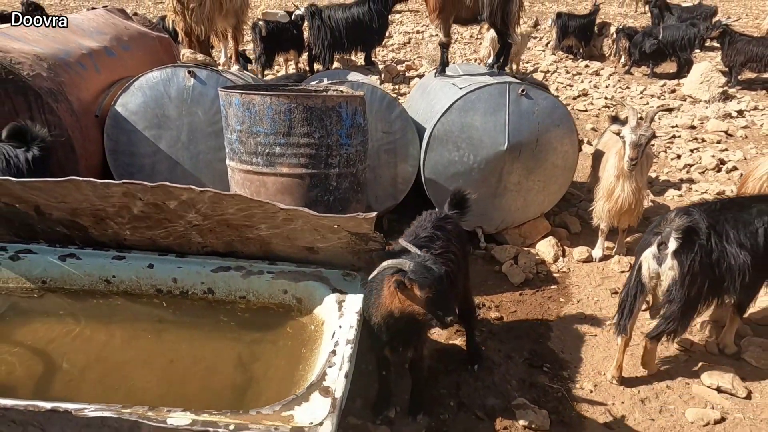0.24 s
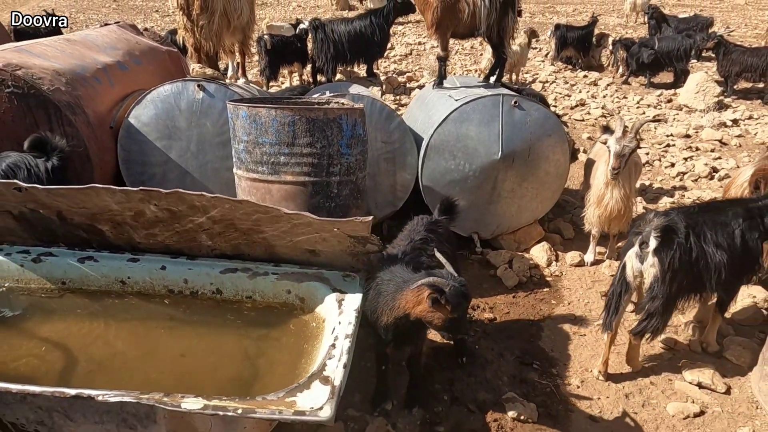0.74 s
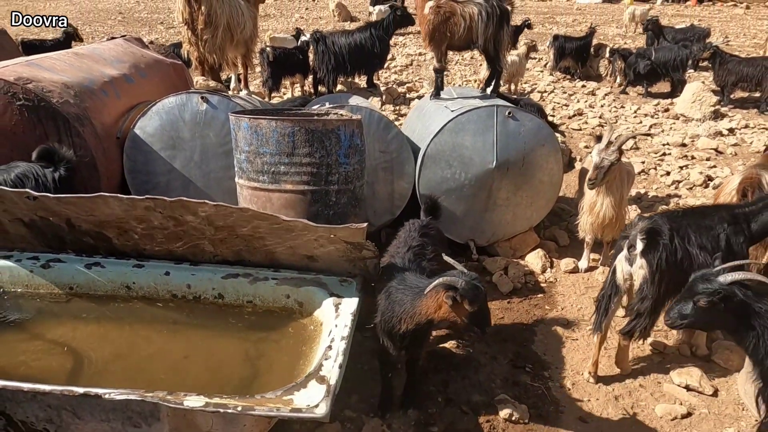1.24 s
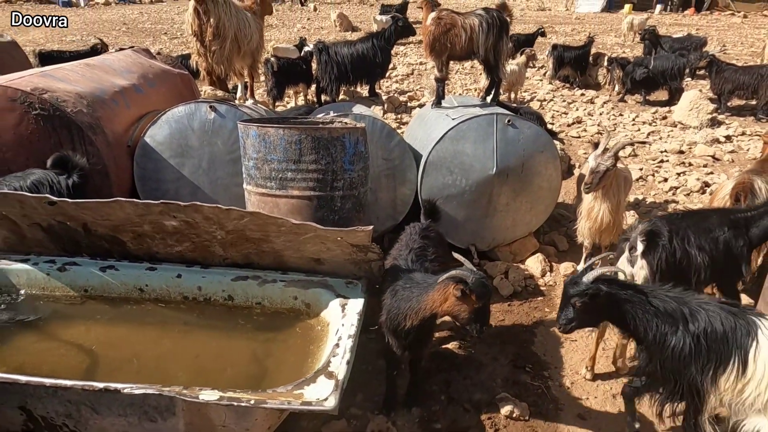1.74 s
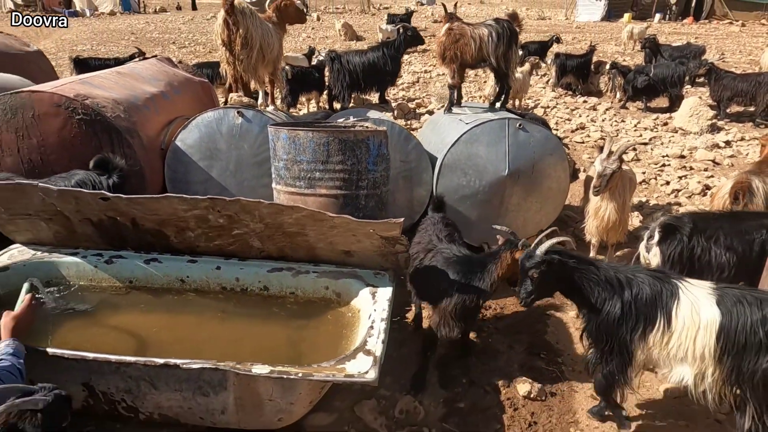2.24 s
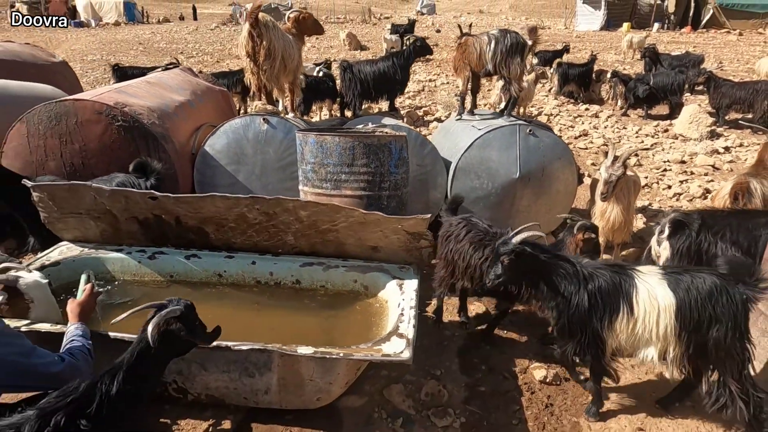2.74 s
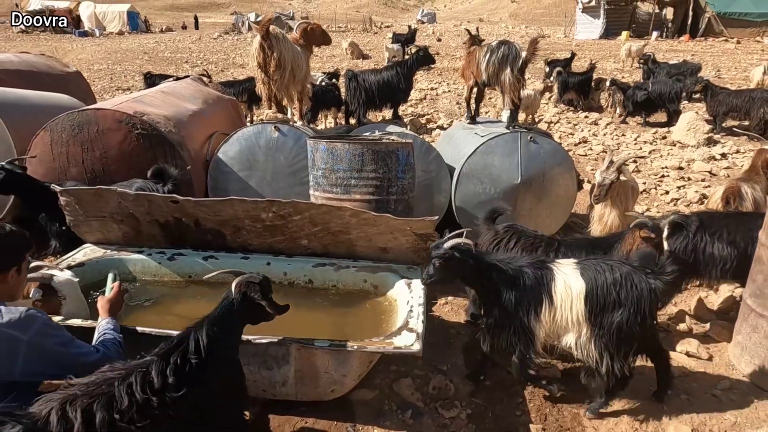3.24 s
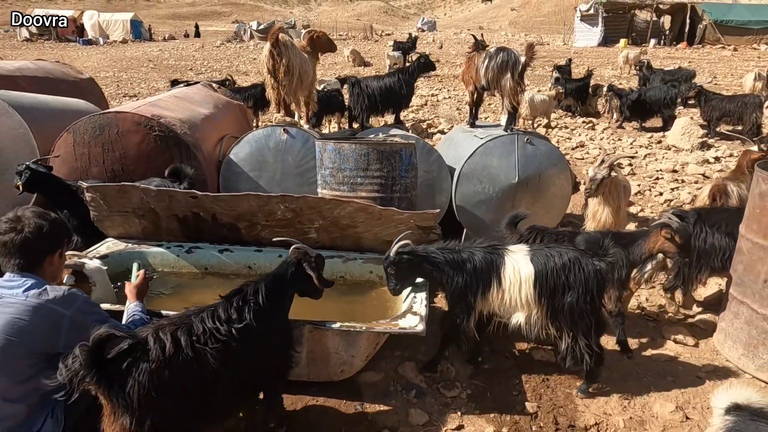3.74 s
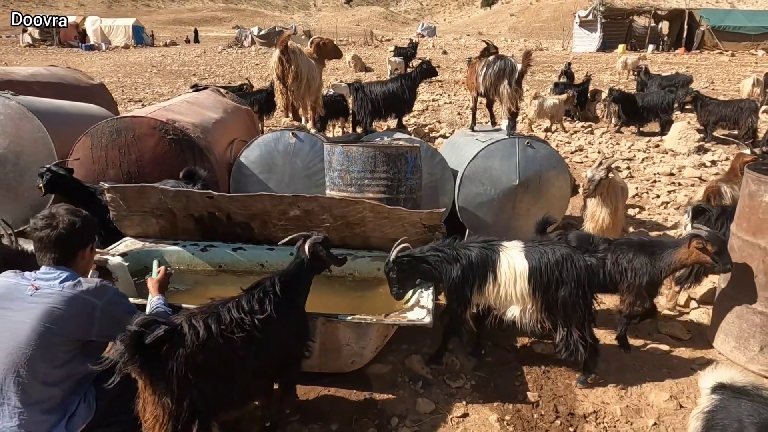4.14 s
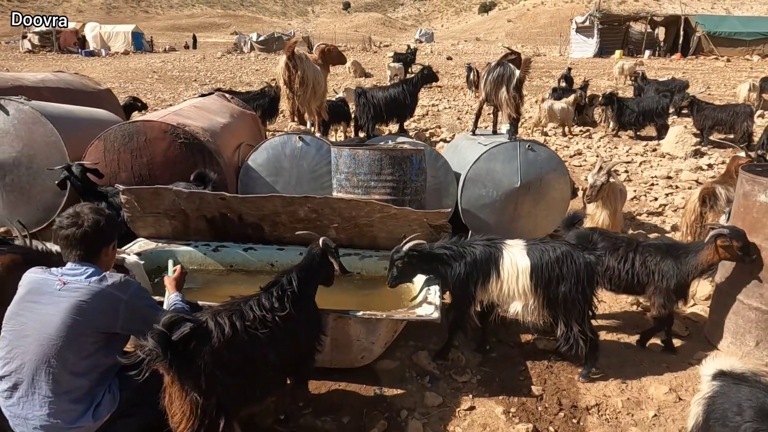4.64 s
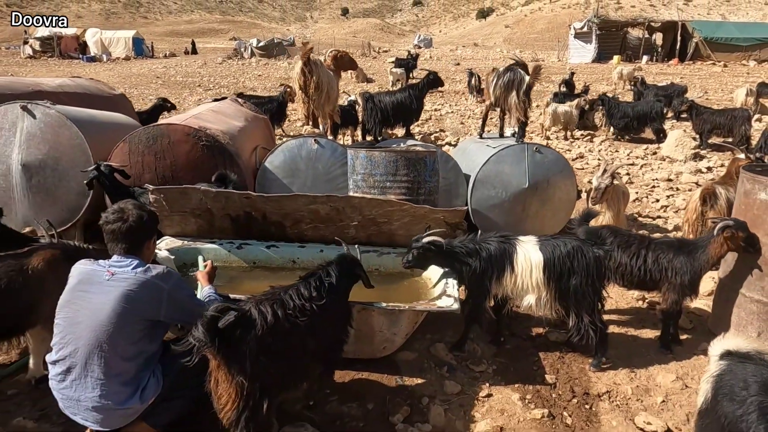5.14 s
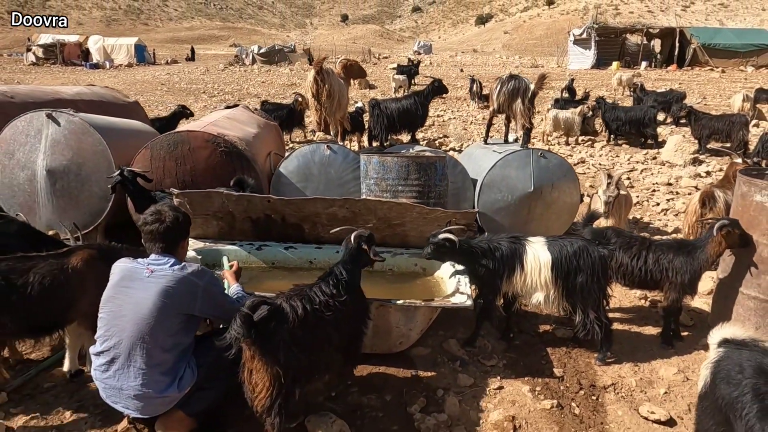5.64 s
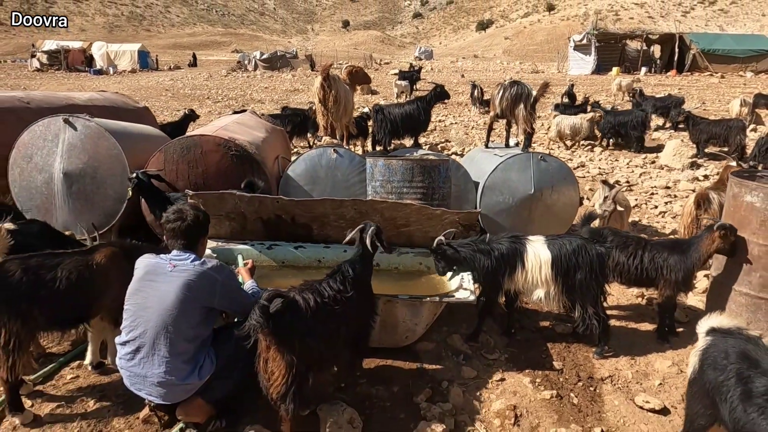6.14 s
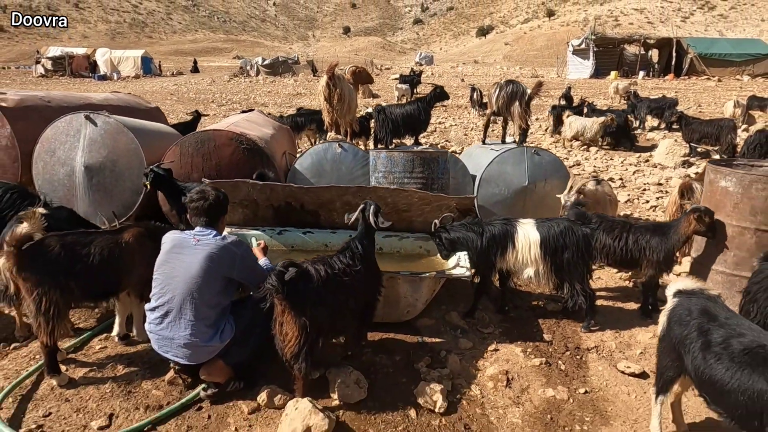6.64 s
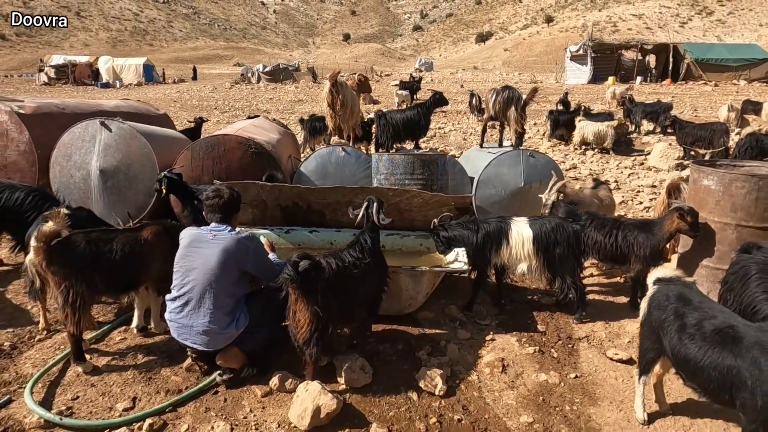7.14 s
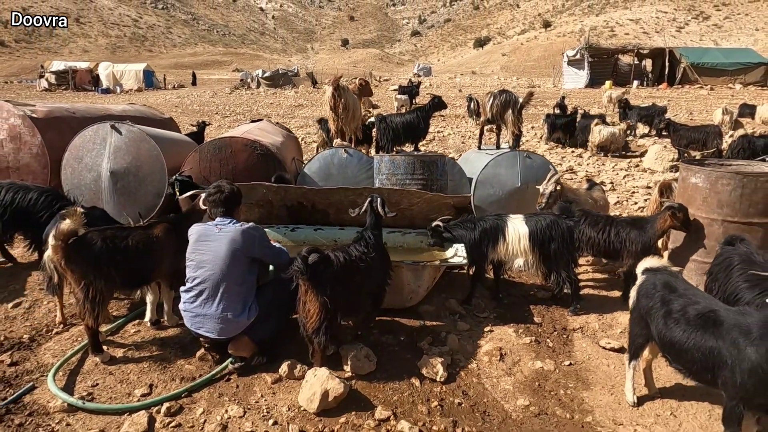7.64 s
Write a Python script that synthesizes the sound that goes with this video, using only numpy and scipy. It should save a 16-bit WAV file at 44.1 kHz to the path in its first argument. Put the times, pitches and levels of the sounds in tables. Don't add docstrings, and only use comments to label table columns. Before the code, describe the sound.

A near goat gives several trembling bleats, answered by shorter calls, over low wind rumble, hoof knocks and gravel scuffs outdoors.

```python
import sys
import numpy as np
from scipy import signal
from scipy.fft import rfft, irfft
from scipy.io import wavfile
from scipy.ndimage import uniform_filter1d

SR = 44100
rng = np.random.default_rng(int(sys.argv[2]) if len(sys.argv) > 2 else 0)


def boost_factor(decibels):
    exponent = np.asarray(decibels, float) / 20
    return 10 ** exponent


def dump(signal):
    limited = np.clip(np.atleast_2d(signal).T, -1, 1)
    pcm = np.round(limited * 32767).astype(np.int16)
    wavfile.write(sys.argv[1], SR, pcm)


N = 347980
TIME = np.arange(N) / SR


def at_hz(points, hz):
    point_hz, point_db = np.transpose(points)
    return np.interp(np.log(hz), np.log(point_hz), point_db)


def rms_one(x):
    return x / np.sqrt(np.mean(x ** 2) + 1e-20)


def drift(rate, size=N):
    r = np.exp(-80 * np.pi * rate / SR)
    slow = signal.lfilter([1], [1, -2 * r, r * r], rng.standard_normal(size // 40 + 2002))[2000:]
    return np.interp(np.arange(size) / 40, np.arange(len(slow)), rms_one(slow))


def band(x, low_hz, high_hz):
    edges_hz = [low_hz, min(high_hz, .45 * SR)]
    return signal.sosfilt(signal.butter(2, edges_hz, "band", fs=SR, output="sos"), x)


def ring(clicks, hz, t60):
    r, w = boost_factor(-60 / (t60 * SR)), 2 * np.pi * hz / SR
    return signal.lfilter([0, np.sin(w)], [1, -2 * r * np.cos(w), r * r], clicks + 1e-18)


def grit(shape, density, spread_db):
    sizes = boost_factor(spread_db * np.minimum(rng.exponential(1, shape), 4)) * rng.choice([-1, 1], shape)
    return sizes * (rng.random(shape) < density)


# [t/s, rumble level/dB]
GUSTS = [(0, -26), (.17, -37.5), (.9, -36.5), (1.05, -33.5), (1.25, -38), (1.4, -26.5), (1.75, -23),
         (2.0, -32), (2.3, -21), (2.5, -30.5), (3.15, -32.5), (3.4, -24), (3.93, -21), (4.2, -32),
         (4.4, -24), (4.92, -22), (5.04, -28.5), (5.2, -23.5), (6.4, -24.5), (7.54, -29.5), (7.89, -26)]
# [t/s, peak level/dB]
SLAPS = [(.047, -30), (.07, -31), (0.306, -32.5), (1.487, -31), (1.52, -33.5), (4.262, -28.5), (4.345, -27),
         (4.893, -23), (1.065, -24.5), (1.383, -18.5), (1.398, -26), (1.416, -23), (1.622, -28.5),
         (1.676, -22.5), (1.724, -12.5), (1.788, -26), (2.266, -26), (2.303, -15), (2.318, -13.5),
         (2.335, -22.5), (2.512, -26), (3.296, -23.5), (4.332, -22.5), (4.515, -22), (4.651, -16.5),
         (4.927, -25), (7.818, -24.5), (7.847, -18.5)]
# offset (dB), share of the gust's swing, share of an eddy's swell
BUFFET, FLUTTER = (-38.5, 0.84, 0.39), (-49, 0.5, 0.4)
EDDY_S, EDDY_FROM_DB = 0.028, -34


def gusts():
    coarse = TIME[::40]
    gust_db = np.interp(TIME, *np.transpose(GUSTS))
    swells = [max(db - EDDY_FROM_DB, 0) * np.exp(-((coarse - at) / EDDY_S) ** 2) for at, db in SLAPS]
    swell_db = np.interp(TIME, coarse, np.max(swells, axis=0))
    swing_db = gust_db - gust_db.mean()
    upper = [db + follows * swing_db + stirs * swell_db for db, follows, stirs in (BUFFET, FLUTTER)]
    return [gust_db] + upper


# [f/Hz, level/dB per Hz]
WIND_COLOUR = [(12, -38), (20, 2.5), (65, -2), (189, -11.5), (310, -26), (348, -25.5), (472, -36.5),
               (640, -41.5), (830, -65), (1410, -120)]


def wind():
    hz = np.arange(1, N // 2 + 2) * SR / N
    turbulence = rfft(rng.standard_normal(N)) * boost_factor(at_hz(WIND_COLOUR, hz))
    below_80, below_200 = [1 / (1 + (hz / edge) ** 7) for edge in (80, 200)]
    ranges = [below_80, below_200 - below_80, 1 - below_200]
    lumps, out = drift(25.8), np.zeros(N)
    for share, level_db, shared_db, own_db in zip(ranges, gusts(), (1.2, 2.5, 3.8), (1.2, 1.8, 2.8)):
        gain = boost_factor(level_db + shared_db * lumps + own_db * drift(17.7) - 1.5)
        out += gain * rms_one(irfft(turbulence * share, N))
    lean_s = 0.00372
    t = np.arange(-400, 1400) / SR
    push = np.exp(-np.abs(t - lean_s) / (0.47 * lean_s))
    push -= 0.3 * np.exp(-((t - 3 * lean_s) / (2.0 * lean_s)) ** 2)
    push = np.convolve(push, np.hanning(25) / 12, "same")
    for at, db in SLAPS:
        i = round(at * SR) - 400
        out[i:i + len(t)] -= boost_factor(db + 7.5) * push[:N - i]
    return out


def patchy(white, spectrum, low_hz, high_hz, shared_db, own_db, rate):
    out, together = 0, drift(rate)
    edges = low_hz * 2 ** np.arange(0, np.log2(high_hz / low_hz) + .25, .5)
    for k, (low, high) in enumerate(zip(edges, edges[1:])):
        level_db = at_hz(spectrum, np.sqrt(low * high)) + shared_db * together + own_db * drift(rate)
        out = out + boost_factor(level_db) * band(white[k % 2], low, high)
    return rms_one(out)


# [t/s, level/dB]
SHUFFLE = [(0.0, -59), (1.34, -51.5), (1.95, -57.5), (2.52, -50), (5.49, -55), (5.82, -53.5), (6.31, -58),
           (7.58, -58), (7.89, -52)]
# [f/Hz, level/dB per Hz]
SHUFFLE_COLOUR = [(210, -31), (350, 2.5), (758, -12), (827, -20), (1380, -7), (1500, -19), (2030, -7.5),
                  (2380, -13), (4670, -16.5), (6870, -29), (8930, -67.5), (15100, -120)]
# [f/Hz, width/Hz, level/dB]
FLOCK = [(948, 277, -1.5), (2123, 290, -5), (2900, 500, -8.5)]


def shuffle():
    s, level_db = np.transpose(SHUFFLE)
    bed = patchy(rng.standard_normal((2, N)), SHUFFLE_COLOUR, 385.6, 8000, 3.0, 4.24, rate=25.7)
    clicks = grit(N, 150 / SR * boost_factor(5 * drift(5.5)), spread_db=2.5)
    dealt = rng.integers(0, 16, N)
    crunch, air = 0, rng.standard_normal(N)
    for k, hz in enumerate(np.geomspace(800, 6500, 16)):
        puffs = signal.fftconvolve(np.abs(clicks) * (dealt == k), np.hanning(500), "same") * air
        stones = ring(puffs, hz, 22 / hz) * np.sqrt(hz / SR)
        crunch = crunch + boost_factor(at_hz(SHUFFLE_COLOUR, hz)) * stones
    chorus = 0
    for hz, width, db in FLOCK:
        gain = boost_factor(db + 4.7 * drift(17.5) + 0.5)
        chorus = chorus + gain * rms_one(band(rng.standard_normal(N), hz - width / 2, hz + width / 2))
    flock = bed + boost_factor(-2.5) * rms_one(crunch) + boost_factor(-9.5) * chorus
    return boost_factor(np.interp(TIME, s, level_db)) * flock


# [t/s, bright level/dB, brightest level/dB]
RUSTLE = [(0, -91, -94), (.6, -88, -88), (1.4, -87.5, -90), (1.52, -88.5, -112), (4.3, -88.5, -112),
          (5.0, -89.5, -112), (7.3, -96, -112), (7.89, -90, -105)]


def rustle():
    s, bright_db, brightest_db = np.transpose(RUSTLE)
    white, patches = rng.standard_normal((2, N)), drift(35)

    def steep(x, low_hz, high_hz):
        return rms_one(band(band(x, low_hz, high_hz), low_hz, high_hz))

    bright_gain = boost_factor(np.interp(TIME, s, bright_db) + 6.5 * patches)
    brightest_gain = boost_factor(np.interp(TIME, s, brightest_db) + 3.1 * patches + 3.0 * drift(30))
    return bright_gain * steep(white[0], 7000, 11200) + brightest_gain * steep(white[1], 11700, 14000)


# [t/s, length/s, level/dB, centre f/Hz]
SCUFFS = [(1.225, 0.02, -49, 3500), (2.952, 0.051, -38.5, 700), (3.003, 0.38, -51, 500),
          (5.6, 0.016, -58, 4350), (5.124, 0.048, -38.5, 1470), (5.138, 0.01, -39, 2500),
          (5.05, 0.017, -50, 2500), (4.7, 0.029, -50, 2500), (5.262, 0.074, -45, 1140),
          (5.335, 0.023, -54, 5400), (1.5, 0.036, -49, 1300), (5.249, 0.019, -32.5, 2250),
          (5.22, 0.066, -38.5, 1460), (7.671, 0.022, -43, 3800), (7.7, 0.089, -41.5, 900),
          (7.695, 0.063, -49, 2640), (2.953, 0.045, -46.5, 2400), (1.99, 0.065, -52.5, 2200),
          (7.832, 0.029, -56, 3600), (7.55, 0.12, -57, 1400), (.08, 0.028, -55.5, 2600),
          (5.6, 0.013, -52, 3000), (1.745, 0.016, -50, 2300)]


def scuffs():
    out = np.zeros(N)
    for at, length, db, hz in SCUFFS:
        u = np.arange(SR // 4) / SR / length
        gravel = grit(len(u), .08, spread_db=3.5)
        crunch = rms_one(band(band(gravel, hz / 1.8, hz * 1.7), hz / 2.4, hz * 1.9))
        swell = np.minimum(u * length / 0.0046, 1) * np.exp(-u ** 3)
        i = round(at * SR)
        out[i:i + len(u)] += (boost_factor(db) * crunch * swell)[:N - i]
    return out


def steps(events, broad_db, gain_db, ring_s, low_hz, high_hz, contact, reach):
    out, t = np.zeros(N), np.arange(SR // 6) / SR
    crunch = grit((len(events), len(t)), .13, spread_db=6.5)
    crunch[:, 20:28] += contact * np.hanning(8)
    for (at, db, hz, t60), grains in zip(events, crunch):
        burst = grains * boost_factor(-60 * t / max(t60, .005))
        stone = rms_one(ring(burst, hz, ring_s) - 0.73 * ring(burst, hz * 1.155, ring_s))
        sound = stone + boost_factor(broad_db) * rms_one(band(burst, low_hz, high_hz))
        sound = signal.sosfilt(signal.butter(3, min(reach * hz, 9000), fs=SR, output="sos"), sound)
        i = round(at * SR)
        out[i:i + len(t)] += (boost_factor(db + gain_db) * sound / np.abs(sound).max())[:N - i]
    return out


# [t/s, peak level/dB, f/Hz, t60/s]
KNOCKS = [(1.936, -33, 1480, 0.038), (2.109, -36, 1520, 0.04), (3.079, -36, 1110, 0.048),
          (3.13, -30, 1150, 0.039), (4.601, -31.5, 1280, 0.04), (4.844, -36.5, 2030, 0.023),
          (5.019, -42, 1060, 0.068), (5.1245, -14.5, 1150, 0.028), (5.14, -26, 1250, 0.04),
          (5.162, -31, 1160, 0.086), (5.186, -25.5, 1160, 0.025), (5.188, -33, 2590, 0.02),
          (5.111, -32, 2290, 0.065), (5.268, -21, 1500, 0.04), (5.288, -27, 1240, 0.04),
          (5.32, -32, 1200, 0.04), (5.454, -36, 1010, 0.05), (6.481, -39.5, 2100, .079),
          (6.672, -45, 840, 0.092), (6.869, -37.5, 1150, 0.022), (7.751, -39, 860, 0.061),
          (5.2515, -22, 1140, .03), (7.604, -39, 696, .02), (7.755, -38, 1700, .03),
          (2.233, -43, 1000, .03), (.195, -43, 2300, .03), (.21, -42, 2200, 0.044), (.418, -43, 1600, .04),
          (4.986, -42, 2000, .03)]
# [t/s, peak level/dB, f/Hz, t60/s]
STAMPS = [(.125, -31, 1290, 0.032), (.4365, -33, 1500, 0.018), (1.707, -38, 1200, 0.03),
          (1.717, -31, 2200, 0.03), (2.302, -29, 535, 0.096), (.2555, -48, 2500, 0.02),
          (1.975, -31, 1390, 0.051), (2.957, -24, 1500, 0.03), (3.285, -29, 640, .04),
          (5.064, -21.5, 780, 0.024), (5.249, -13.5, 3130, 0.018), (5.3, -15, 700, 0.04),
          (5.261, -14, 1500, 0.085), (5.34, -27.5, 647, 0.037), (6.235, -29, 1500, 0.07),
          (6.28, -33.5, 1200, 0.079), (6.739, -39, 2030, 0.36), (7.674, -26.5, 905, 0.18),
          (7.704, -28, 750, 0.18)]


def knocks():
    heavy = dict(gain_db=-2.5, ring_s=0.011, reach=3.4, low_hz=295, high_hz=2030)
    return steps(KNOCKS, -12.0, contact=4.0, **heavy) + steps(STAMPS, 2.5, contact=9.0, **heavy)


# [t/s, peak level/dB]
TICKS = [(0.1585, -68), (.177, -64), (.285, -67), (0.3426, -57.5), (.35, -63.5), (.408, -66.5), (.437, -66),
         (0.7562, -63), (0.996, -64), (1.1934, -64), (1.248, -57.5), (2.3126, -54.5), (7.6735, -62.5),
         (7.861, -75)]


def ticks():
    out = np.zeros(N)
    fade = np.exp(-np.arange(220) / 50)
    for (at, db), puff in zip(TICKS, rng.standard_normal((len(TICKS), 220))):
        out[round(at * SR):][:220] += boost_factor(db + 36) * puff * fade
    return band(band(out, 10500, 16500), 11000, 17000)


# [t/s, peak level/dB, f/Hz, t60/s]
CLICKS = [(.256, -48, 5650, 0.02), (2.2172, -42, 3200, 0.0068), (2.2762, -53, 3200, .069),
          (2.83, -42, 3010, 0.086), (3.0046, -43, 3290, 0.043), (3.8932, -41, 2790, 0.12),
          (4.8726, -39.5, 4830, 0.022), (5.4987, -42, 2810, 0.043), (5.5363, -37, 2800, 0.041),
          (5.8752, -44, 3000, 0.024), (6.3604, -50, 5870, 0.035), (6.9182, -41, 2940, 0.076),
          (5.226, -42, 3700, .15), (7.616, -49, 5170, .03), (7.678, -42, 4530, .06),
          (7.738, -54, 5000, .02), (7.773, -50, 3500, .04), (6.995, -48, 3120, .04), (7.38, -49, 3800, .04)]
# [t/s, peak level/dB, f/Hz, t60/s]
CRUNCHES = [(.3511, -41.5, 3020, 0.056), (2.3555, -38, 2530, .03), (3.0778, -41, 4440, 0.043),
            (3.4292, -39.5, 2980, 0.051), (5.2615, -25, 3300, 0.0073), (5.3293, -38, 2900, .03),
            (5.339, -40, 5070, 0.03), (5.4374, -44, 3210, 0.061), (6.5637, -44.5, 3130, 0.017),
            (6.8124, -48, 4420, .04), (7.3828, -41.5, 2330, 0.031)]
# [t/s, peak level/dB, f/Hz]
PEBBLES = [(0.2553, -49, 5670), (0.3496, -42, 3480), (0.4978, -35, 3830), (0.6479, -41, 3800),
           (1.1184, -51, 3866), (1.2316, -37, 3520), (1.4107, -46, 3790), (1.9624, -47, 4490),
           (1.9929, -43, 4550), (2.2877, -43.5, 4340), (2.3565, -40, 4230), (2.5017, -45, 3730),
           (2.9522, -37, 4780), (3.0829, -39, 4540), (3.2121, -44, 5200), (3.2705, -40, 4900),
           (3.3877, -40, 3800), (3.4535, -41, 5020), (4.3949, -48, 4940), (4.4308, -48, 3590),
           (4.4937, -44, 5430), (4.5446, -51, 4930), (4.7022, -48, 3950), (4.8723, -37, 4760),
           (5.0205, -50, 3600), (5.0569, -46, 3830), (5.1402, -38, 3700), (5.2485, -26, 3650),
           (5.3398, -41, 4820), (5.4365, -47, 3570), (5.5373, -44, 3770), (5.874, -44, 3900),
           (6.2357, -37, 4220), (6.327, -48, 3950), (6.3609, -44, 6060), (6.5141, -51, 4770),
           (6.5655, -48, 5100), (6.775, -46, 5990), (6.8129, -44, 4400), (6.8733, -48, 3780),
           (7.3816, -48, 3870), (7.6161, -46, 5240), (7.6779, -38, 4400), (7.8366, -49, 3660)]


def hooves():
    light = dict(gain_db=3.5, ring_s=0.021, reach=2.8, low_hz=1500, high_hz=6140, contact=4.9)
    pebbles = [(s, db - 2.5, hz, .03) for s, db, hz in PEBBLES]
    return steps(CLICKS, -11.5, **light) + steps(CRUNCHES, -0.98, **light) + steps(pebbles, -4.0, **light)


# [f/Hz, share]
MOUTH_CLOSING = [(300, 0.51), (600, 0.31), (900, 2.2), (1150, 0.15), (1800, 1.44), (2150, 0.043),
                 (3000, 0.9), (7000, 0.34)]
DULLING_DB_PER_S = -100
HOARSE_TONE_DB, HOARSE_AIR_DB = -7, 16


def voice(s, pitch_hz, level_s, level_db, closing_db, throat, jitter, breath_db, tiring_db,
          breaks_s=9, dulls_s=9):
    span = slice(round(s[0] * SR), round(s[-1] * SR))
    t = TIME[span]

    def smooth(at, values, size=441):
        return uniform_filter1d(np.interp(t, at, values), size=size, mode="nearest")

    f0 = smooth(s, pitch_hz) * (1 + jitter * drift(60, size=len(t)))
    phase = 2 * np.pi * np.cumsum(f0) / SR
    order = np.arange(1, 19)[:, None]
    waver_db = 2.2 * np.array([drift(25, size=len(t)) for k in order])
    weights = boost_factor(at_hz(throat, order * f0) + waver_db)
    weights /= np.sqrt(np.sum(weights ** 2, axis=0) / 2)
    octaves_up = np.maximum(np.log2(order * f0 / 1000), 0)
    dull_db = DULLING_DB_PER_S * np.maximum(t - dulls_s, 0) * octaves_up
    weights *= boost_factor(at_hz(MOUTH_CLOSING, order * f0) * smooth(level_s, closing_db) + dull_db)
    tone = np.sum(weights * np.sin(order * phase + rng.uniform(0, 1.0, order.shape)), axis=0)

    noise = rng.standard_normal(len(t)) * (1 + np.cos(phase))
    hz = np.arange(1, len(t) // 2 + 2) * SR / len(t)
    breath = rms_one(irfft(rfft(noise) * boost_factor(at_hz(throat, hz)), len(t)))
    fade = np.clip(np.minimum(t - s[0], s[-1] - t) / 0.033, 0, 1)
    progress = (t - s[0]) / (s[-1] - s[0])
    hoarse = np.clip((t - breaks_s) / 0.015, 0, 1)
    tone_db = smooth(level_s, level_db)
    air_db = tone_db + hoarse * (smooth(level_s, level_db, size=3500) - tone_db + HOARSE_AIR_DB)
    air_db = air_db + breath_db + tiring_db * progress ** 2
    out = np.zeros(N)
    out[span] = fade * (boost_factor(tone_db + hoarse * HOARSE_TONE_DB) * tone + boost_factor(air_db) * breath)
    return out


CREST_HOLD_S, OPENING_S = .004, 0.033
SURGE_S, FIRST_RISE = .028, .88


def quaver(bleat, throbs, throat, breaks_s=9):
    count, early, fall_s, jitter, breath_db = bleat
    crest, high_hz, low_hz, loud_db, dip_db = np.transpose(throbs)
    from_hz = np.r_[FIRST_RISE * high_hz[0], low_hz[:-1]]
    soft_db = loud_db - dip_db
    before_db = np.r_[soft_db[0], soft_db[:-1]]

    surge_s, fallen_s = crest - SURGE_S, crest + fall_s + CREST_HOLD_S
    throb_s = np.c_[surge_s, crest - CREST_HOLD_S, crest + CREST_HOLD_S, fallen_s]
    s = np.r_[crest[0] - .045, throb_s.ravel(), crest[-1] + .045]
    throb_hz = np.c_[from_hz + early * (high_hz - from_hz), high_hz, high_hz, low_hz]
    pitch_hz = np.r_[from_hz[0], throb_hz.ravel(), low_hz[-1] * .95]

    mouth_s = np.c_[crest - OPENING_S, crest - .015, crest + .008, crest + .03]
    level_s = np.r_[s[0], mouth_s.ravel()]
    opening_db = 0.6 * before_db + 0.4 * loud_db + 3
    mouth_db = np.c_[opening_db, loud_db - 1.0, loud_db + 0.7, soft_db + 3]
    level_db = np.r_[loud_db[0] - 9, mouth_db.ravel()]
    closing_db = np.r_[0, np.tile([-7.5, 0, 0, -11.], count)]
    return voice(s, pitch_hz, level_s, level_db, closing_db, throat, jitter=jitter, breath_db=breath_db,
                 tiring_db=-1.5, breaks_s=breaks_s)


# [t/s, f/Hz, level/dB]
LONG_CALL = [(.92, 336.4, -53), (1.19, 345, -62), (1.25, 350, -43), (1.42, 349, -42.5), (1.55, 345, -43.5),
             (1.62, 331.6, -43), (1.662, 302.6, -38.5), (1.682, 268, -43), (1.705, 240, -63)]
WOBBLE_HZ, WOBBLE_SHARE, WOBBLE_TOP_S, WOBBLE_ENDS_S, WOBBLE_DB = 11.2, 0.022, 1.277, 1.52, 1.5


def long_call():
    at, pitch_hz, level_db = np.transpose(LONG_CALL)
    s = np.linspace(at[0], at[-1], 80)
    tremble = np.cos(2 * np.pi * WOBBLE_HZ * (s - WOBBLE_TOP_S))
    tremble = tremble * np.clip((WOBBLE_ENDS_S - s) / 0.08, .15, 1)
    trembling_hz = np.interp(s, at, pitch_hz) * (1 + WOBBLE_SHARE * tremble)
    return np.c_[s, trembling_hz, np.interp(s, at, level_db) + WOBBLE_DB * tremble]


def short_call(start, length, first_hz, last_hz, db):
    share = np.array([0, .4, .4 + .35, 1])
    pitch_hz = first_hz + (last_hz - first_hz) * np.sin(share * 1.65) / np.sin(1.65)
    return np.c_[start + length * share, pitch_hz, db - np.array([10, 0, 0, 10])]


# [throbs, early share of the climb, crest to trough/s, pitch jitter share, breath level/dB]
BLEATS = [
    (9, .55, .018, .009, -11),
    (6, .25, .026, .009, -13),
    (8, .15, .026, .006, -16),
    (7, .3, .024, .011, -12),
    (5, .5, .03, .006, -18),
]
# [crest t/s, crest f/Hz, trough f/Hz after it, level/dB, dip after it/dB]
THROBS = [(.495, 502, 420, -42.5, 2), (.588, 444.4, 378.3, -40.5, 5.5), (.68, 441.4, 374.7, -41.5, 8),
          (.772, 466, 389.6, -39, 10), (.858, 475, 416, -40.5, 5), (.95, 480.5, 414.6, -39.5, 7.5),
          (1.04, 485, 433.7, -39, 13), (1.13, 477.7, 445, -39, 10), (1.221, 467.4, 380, -39, 14),
          (2.45, 420, 399.2, -35.5, 9.5), (2.54, 445.3, 382.8, -35.5, 14), (2.625, 464.3, 355.6, -34.5, 16),
          (2.712, 442, 353.3, -39, 19), (2.803, 445.7, 349, -38.5, 18), (2.89, 425, 348.5, -43.5, 20),
          (3.655, 421, 347.5, -43, 13), (3.74, 450, 388.5, -35, 13), (3.83, 482.6, 413, -35, 12),
          (3.918, 473, 411, -35, 14), (4.008, 470, 368, -36.5, 17), (4.098, 441.6, 344.2, -40, 15),
          (4.185, 406, 343.7, -42.5, 18), (4.27, 372, 330, -44, 20), (5.582, 474.7, 374, -42.5, 7),
          (5.67, 484.3, 392.2, -34.5, 8), (5.76, 490, 404.3, -34.5, 7.5), (5.848, 496, 402.5, -35, 10.5),
          (5.935, 469, 388, -35, 17.5), (6.025, 462, 369, -37.5, 18), (6.117, 436, 369, -43, 18),
          (6.95, 384, 340, -52, 10), (7.05, 370, 325.4, -51.5, 14), (7.14, 384.3, 328, -50, 17),
          (7.23, 384, 316, -46.5, 21), (7.315, 360, 331, -47.5, 23)]
BRIGHTNESS = [.5, -4, -2, -3]
CHEST = [8.1, 1.2, 3.5, 1.5]
BREAKS_S = [9, 9, 4.105, 9]
# [f/Hz, level/dB]
NEAR_THROAT = [(200, -18.5), (450, -8), (640, -13), (830, 2.5), (950, 4.5), (1300, -7.5), (1500, -11.5),
               (1900, -3.5), (2130, 3.5), (2400, -3), (2700, -11), (3400, -4), (3900, -10), (4500, -29),
               (7000, -45)]
# [f/Hz, level/dB]
FAR_THROAT = [(200, -39), (400, -21), (750, -1), (1150, -1.5), (1500, -11), (2150, 1.5), (2450, -7),
              (2900, -1), (3400, -16.5), (4200, -14), (5000, -28), (7000, -40)]
# [f/Hz, level/dB]
HELD_THROAT = [(200, -18), (350, 2), (520, -15), (700, 0.5), (1000, 4.5), (1400, -5.5), (1700, -9),
               (2150, 2.5), (2600, -6), (3650, 1), (4300, -8), (5500, -15), (7000, -32)]
# [t/s, f/Hz, level/dB]
BARK = [(.5, 323.4, -56), (.52, 335.6, -39.5), (.555, 342, -36), (.575, 305.6, -37), (.6, 258, -38.5),
        (.625, 225, -56)]
# [f/Hz, level/dB]
BARK_THROAT = [(200, -31), (350, -26), (620, -24), (800, 16.5), (1020, 2.5), (1350, -3), (1700, 3),
               (2000, 0.5), (2500, -6), (3050, -4), (3900, -17), (7000, -34)]
# [t/s, length/s, first f/Hz, last f/Hz, peak level/dB]
SHORT_CALLS = [
    (.605, .055, 322, 352, -47),
    (2.51, .08, 468, 503, -43),
    (2.875, .085, 405, 525, -46),
    (3.45, .19, 385, 505, -52),
    (6.13, .11, 356, 336, -53),
    (6.51, .15, 445, 410, -62),
    (2.325, .125, 335, 445, -52),
]
FOCUS_HZ = [990, 980, 1410, 2030, 1022, 850, 2000]
CALL_EDGE_DB = [-21, -20, -18, -5, -14, -21, -20]
# [delay t/s, level/dB]
ECHOES = [(.019, -20), (.043, -19), (.071, -30), (.118, -20.5)]


def goats():
    throbs = np.split(THROBS, np.cumsum([bleat[0] for bleat in BLEATS[:-1]]))
    calls = quaver(BLEATS[-1], throbs[-1], FAR_THROAT)
    for bleat, own, tilt, chest_db, breaks_s in zip(BLEATS, throbs, BRIGHTNESS, CHEST, BREAKS_S):
        throat = [(hz, db + tilt * max(np.log2(hz / 1000), 0) + chest_db * (hz < 520))
                  for hz, db in NEAR_THROAT]
        calls += quaver(bleat, own, throat, breaks_s=breaks_s)

    # (s, 9 being never)
    held = [(long_call(), HELD_THROAT, -10.0, 1.59), (BARK, BARK_THROAT, -6.0, 9)]
    for call, hz, edge_db in zip(SHORT_CALLS, FOCUS_HZ, CALL_EDGE_DB):
        throat = [(200, -30), (hz / 2, edge_db + 6), (hz / 1.3, -15), (hz, 0), (hz * 1.2, edge_db),
                  (3600, edge_db), (7000, -50)]
        held.append((short_call(*call), throat, -12, 9))
    for call, throat, breath_db, dulls_s in held:
        s, pitch_hz, level_db = np.transpose(call)
        calls += voice(s, pitch_hz, s, level_db, 0 * s, throat, jitter=.006, breath_db=breath_db,
                       tiring_db=0, dulls_s=dulls_s)

    taps = np.zeros(SR // 5)
    for lag, db in ECHOES:
        taps[round(lag * SR)] = boost_factor(db)
    return calls + band(signal.fftconvolve(calls, taps)[:N], 300, 3500)


def scene():
    ground = hooves() + knocks() + scuffs() + shuffle() + ticks()
    return (goats() + wind() + ground)[None]


def top_cut(x):
    return signal.sosfilt(signal.butter(12, 15700, fs=SR, output="sos"), x)


def record(dry):
    round_off = .43 * np.tanh(dry / .43)
    top = signal.butter(8, 6500, fs=SR, output="sos")
    already_running = signal.sosfilt_zi(top)[:, None] * round_off[0, 0]
    dull, _ = signal.sosfilt(top, round_off, zi=already_running)
    mix = dull + boost_factor(-32.0) * round_off + rustle()
    return top_cut(mix)


dry = scene()
out = record(dry)
dump(out)
```